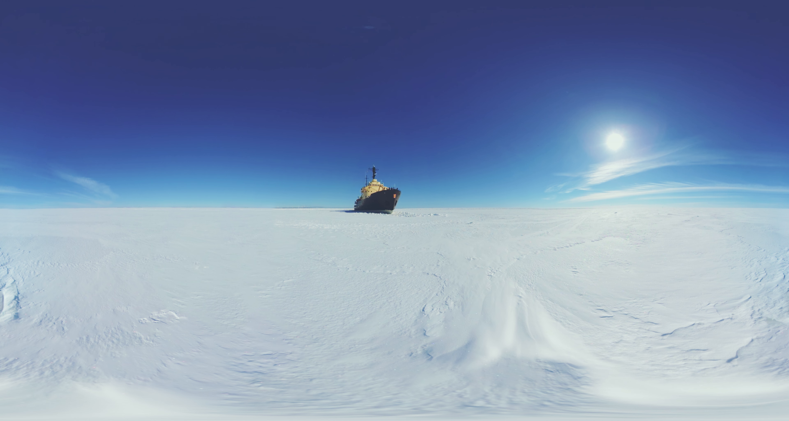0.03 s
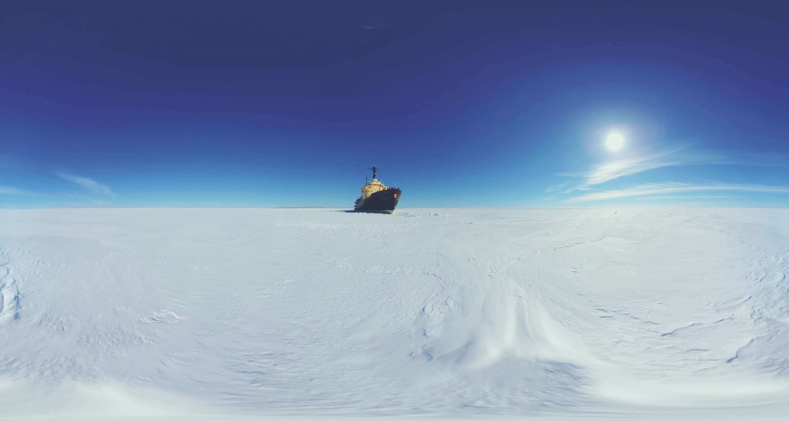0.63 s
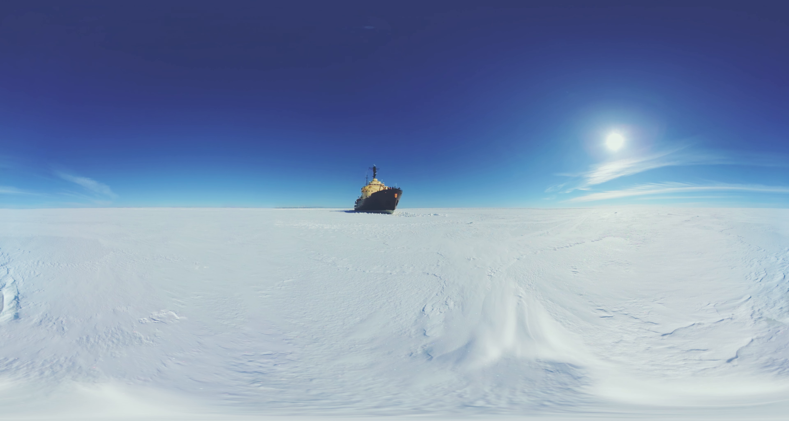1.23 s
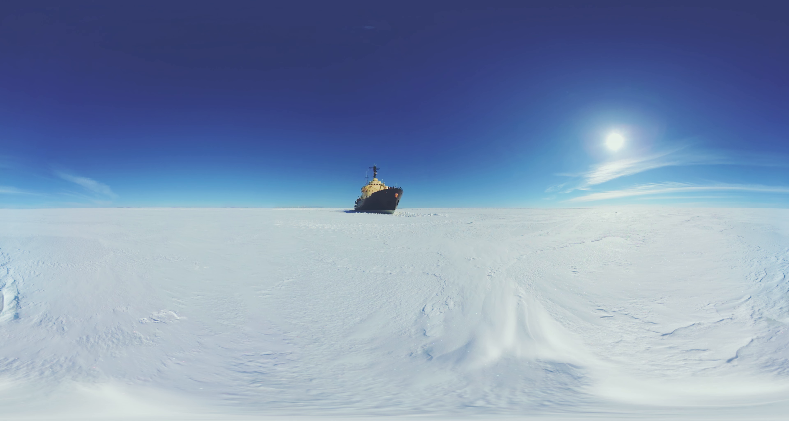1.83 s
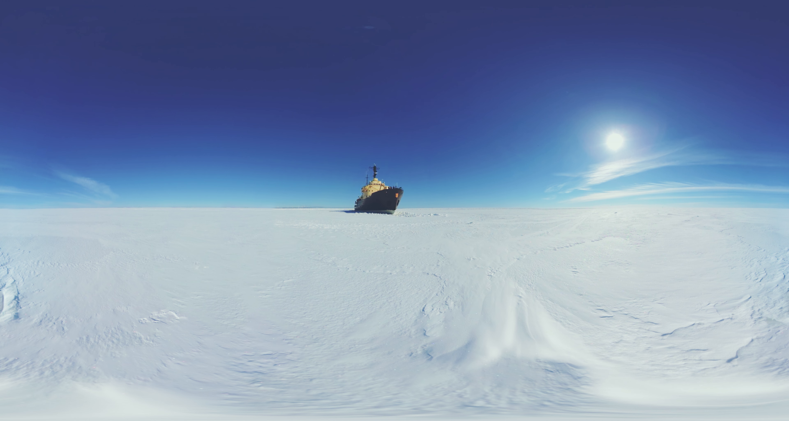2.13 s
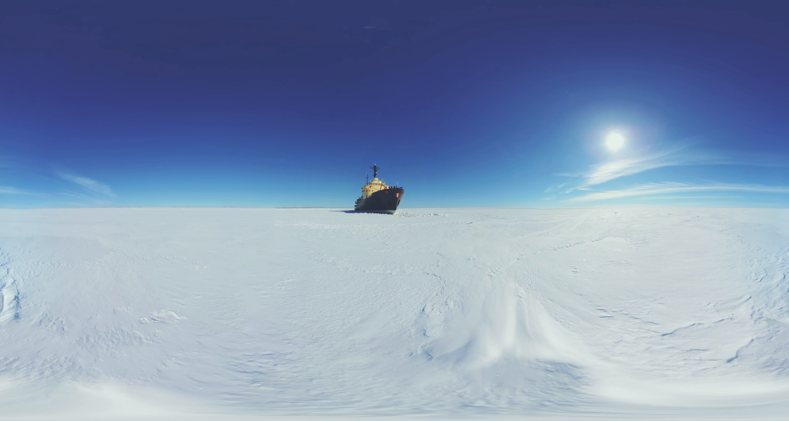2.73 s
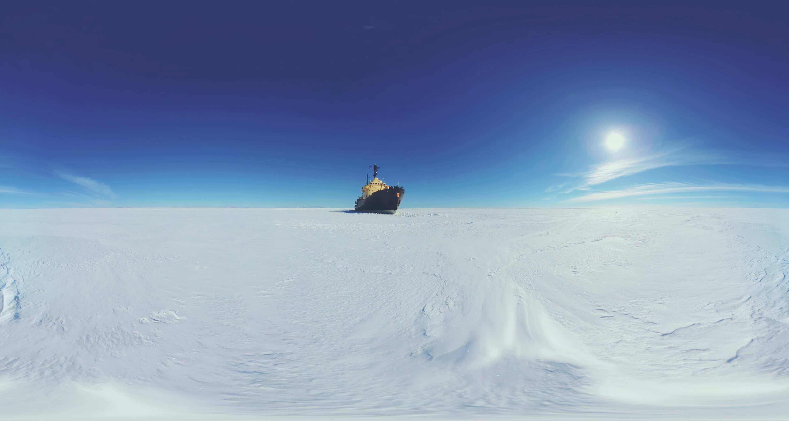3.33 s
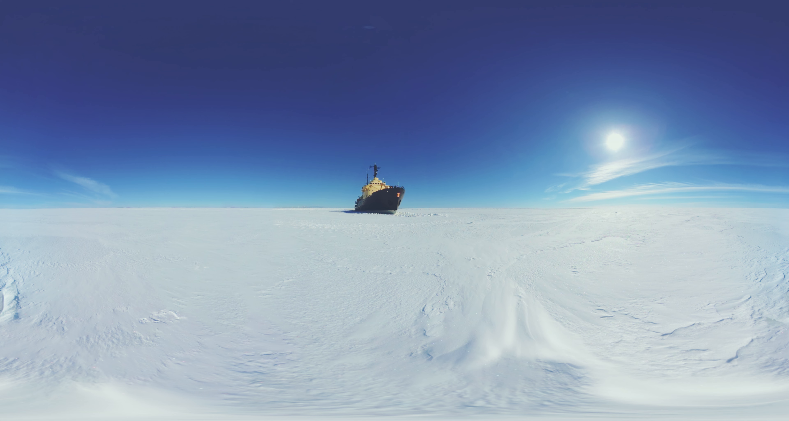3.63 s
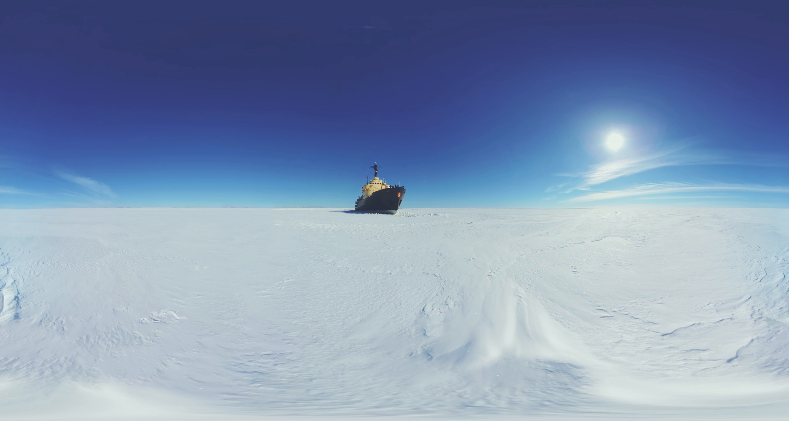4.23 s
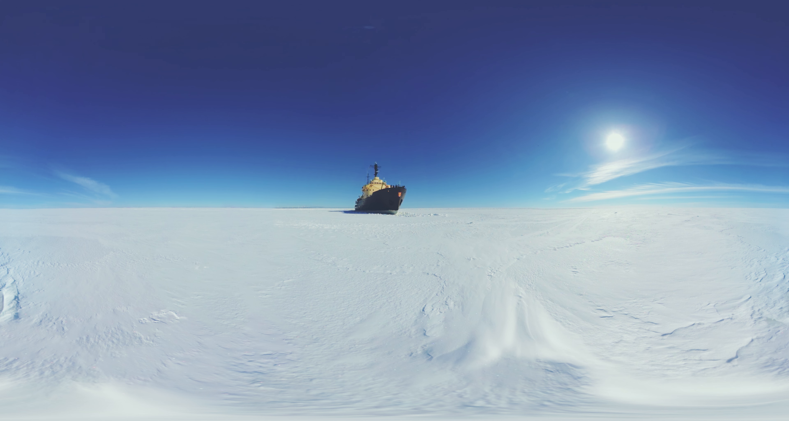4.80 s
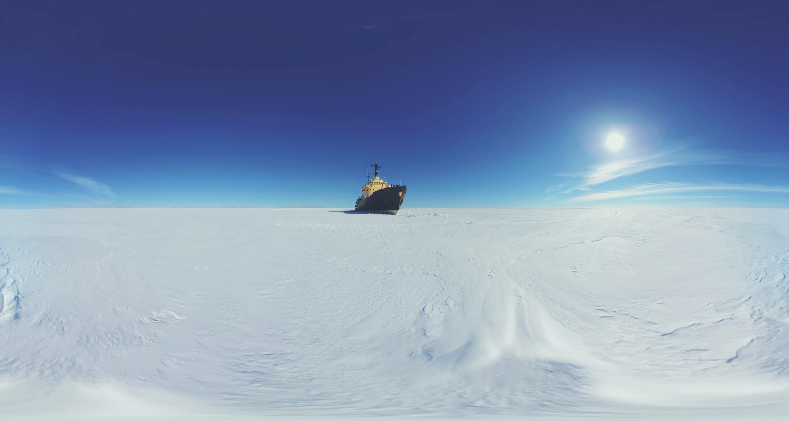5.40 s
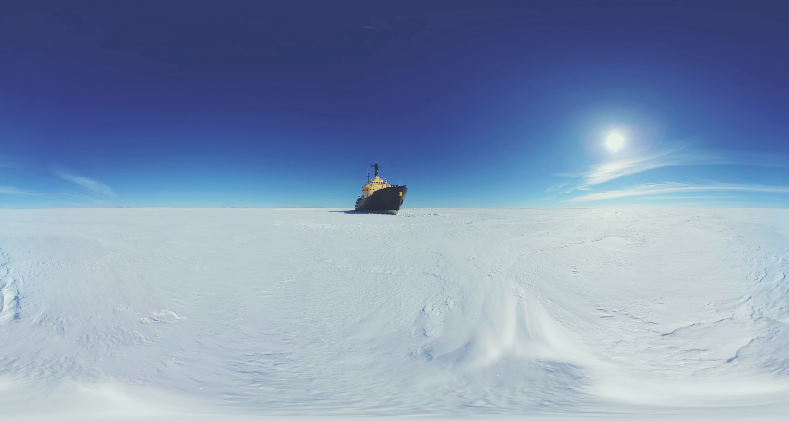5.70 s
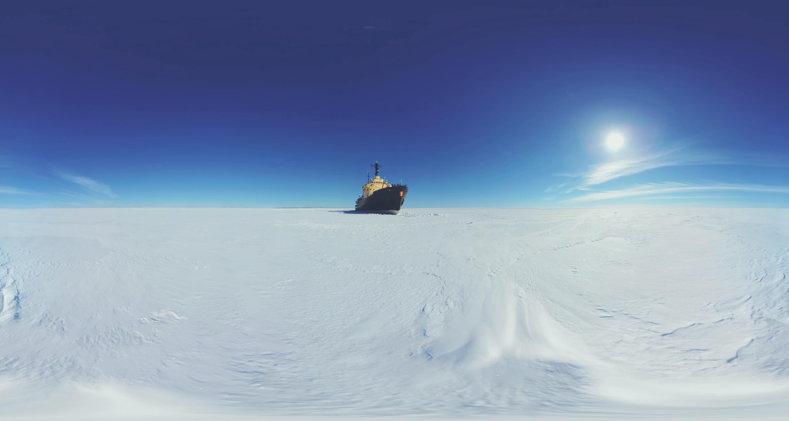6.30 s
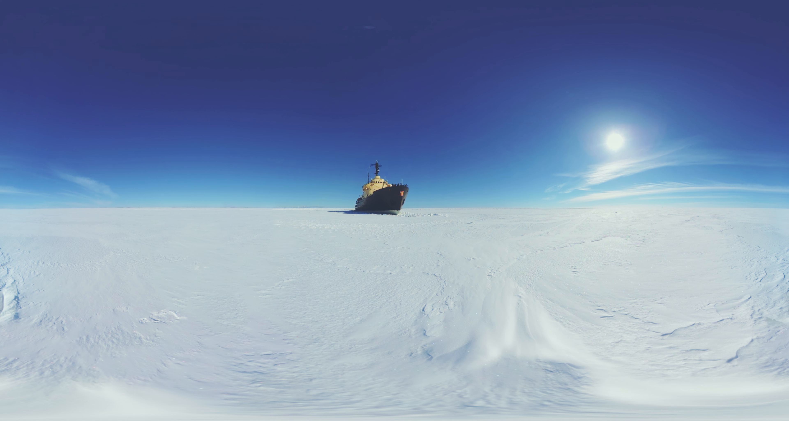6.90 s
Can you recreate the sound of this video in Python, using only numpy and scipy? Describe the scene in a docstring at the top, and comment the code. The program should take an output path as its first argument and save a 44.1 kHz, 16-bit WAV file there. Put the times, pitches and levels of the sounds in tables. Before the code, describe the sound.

Out on an open frozen sea, a light wind makes a low rumble on the microphone while a distant ship's diesel engines hum and slowly pulse. A fan drone from the ship's ducts sits over the engines. Soft rushing air and a barely audible hiss of loose snow continue throughout, with one slight gust early on.

```python
"""An icebreaker's diesel engines throb far off in flat sea ice. They run at slightly different speeds,
so their exhaust tones drift in and out of step and beat. The ship's ventilation drones above them as
fan air rings its ducts. A light wind rumbles at the microphone, drives a faint hiss of loose snow
along the surface and rushes over the ice, with one gentle gust."""
import sys
import numpy as np
from scipy import signal
from scipy.fft import rfft, irfft, next_fast_len
from scipy.io import wavfile

SR = 44100
rng = np.random.default_rng(int(sys.argv[2]) if len(sys.argv) > 2 else 0)


def dump(signal):
    """Clip the signal to [-1, 1] and save it as 16-bit WAV at the path in sys.argv[1]."""
    limited = np.clip(np.atleast_2d(signal).T, -1, 1)
    pcm = np.round(limited * 32767).astype(np.int16)
    wavfile.write(sys.argv[1], SR, pcm)


N = 306495


def from_db(db):
    """Turn decibels into a gain, the number to multiply a sound by."""
    return 10 ** (np.asarray(db) / 20)


def rms_one(x):
    """Scale a signal so that its average strength (rms) is 1."""
    return x / np.sqrt(np.mean(x ** 2) + 1e-30)


def gain_curve(rows):
    """Join (time_s, level_db) points into a gain for every sample."""
    time_s, level_db = np.transpose(rows)
    return from_db(np.interp(np.arange(N) / SR, time_s, level_db))


def drift(rate_hz):
    """A smooth random wander of typical size 1 that changes about rate_hz times a second."""
    step, warm_up = 100, 2000   # one point every 100 samples; skip the points where the filter settles
    memory = np.exp(-2 * np.pi * rate_hz * step / SR)
    jitter = rng.standard_normal(N // step + warm_up + 2)
    slow = signal.lfilter([1], [1, -2 * memory, memory ** 2], jitter)[warm_up:]
    return np.interp(np.arange(N) / step, np.arange(len(slow)), rms_one(slow))


def colour(x, spectrum):
    """Filter a sound by a (pitch_hz, gain_db) curve; beyond its ends the sound dies away steeply."""
    pitch_hz, gain_db = np.transpose(spectrum)
    size = next_fast_len(N)
    bins_hz = np.maximum(np.fft.rfftfreq(size, 1 / SR), 1)
    edge_fade = np.minimum(1, np.minimum(bins_hz / pitch_hz[0], pitch_hz[-1] / bins_hz)) ** 5
    gain = from_db(np.interp(np.log(bins_hz), np.log(pitch_hz), gain_db))
    return irfft(rfft(x, size) * edge_fade * gain, size)[:N]


def noise(spectrum):
    """The noise of swirling air, shaped by a (pitch_hz, level_db_per_hz) curve."""
    return colour(rng.standard_normal(N) * np.sqrt(SR / 2), spectrum)


def diesel(cycle_hz, exhaust, disorder, speed_wander, fading_db, phase_wander, roughness):
    """Uneven cylinders make tones at multiples of the cycle rate; partly in step, they throb."""
    speed_hz = cycle_hz * (1 + speed_wander * drift(0.49))   # the speed control never quite settles
    cycles = rng.random() + np.cumsum(speed_hz) / SR
    tones = np.zeros(N)
    for multiple, level_db in exhaust:
        phase = 2 * np.pi * (multiple * cycles + disorder * rng.random())
        phase += phase_wander * drift(1.5)   # moving air shifts and fades each tone
        tones += from_db(level_db + fading_db * drift(1.2)) * np.sqrt(2) * np.sin(phase)
    return tones * (1 + roughness * drift(20))   # no two firings are equally strong


def engines(lead_hz=5.222, twin_hz=5.165, generator_hz=5.383):
    """Three four-stroke diesels beat together: a lead engine, its slower twin and a deep generator."""
    # exhaust tones of the two main engines, before each one's own gain: cycle_multiple, level_db
    main_exhaust = [(5, -51.4), (7, -53.8), (8, -50.0), (10, -55.0), (11, -63.1), (12, -58.3), (13, -61.5),
                    (18, -61.2), (19, -63.5), (20, -53.3), (21, -52.8), (22, -54.9), (23, -56.1), (25, -67),
                    (30, -53.2), (31, -61.3), (32, -53.7), (33, -56.7), (34, -57.1), (35, -63.5),
                    (36, -65.1), (37, -67.0), (46, -77), (47, -76), (48, -72), (49, -75)]
    # exhaust tones of the generator: cycle_multiple, level_db
    generator_exhaust = [(5, -49.1), (8, -52.2), (10, -50.2)]
    lead = diesel(lead_hz, main_exhaust,
                  disorder=.8, speed_wander=.0015, fading_db=1.6, phase_wander=.3, roughness=.13)
    twin = diesel(twin_hz, main_exhaust,
                  disorder=.9, speed_wander=.0025, fading_db=2.0, phase_wander=.45, roughness=.2)
    dull_twin = signal.sosfilt(signal.butter(2, 190, fs=SR, output="sos"), twin)
    generator = diesel(generator_hz, generator_exhaust,
                       disorder=1, speed_wander=.002, fading_db=2.0, phase_wander=.35, roughness=.15)
    return from_db(-0.5) * lead + from_db(-6.5) * dull_twin + swell() * generator


def swell(crest_s=.72, period_s=1.123, depth_db=1.0, start_db=0.12, fall_db_per_s=0.16):
    """Gain of the generator and the rumble: they swell about once a second and slowly grow quieter."""
    t = np.arange(N) / SR
    wave = np.cos(2 * np.pi * (t - crest_s) / period_s)
    return from_db(start_db - fall_db_per_s * t + depth_db * wave)


def ventilation(fading_db=0.46, start_db=-0.93, rise_db_per_s=0.16):
    """Swirling fan air rings the ducts; each note swells and fades on its way over the ice."""
    # notes at which the ducts and their casing ring: pitch_hz, width_hz, level_db
    ducts = [(349.2, 13, -74.5), (422, 16, -75), (475, 29.6, -67.5), (519.3, 13, -73.5), (551.2, 22, -70),
             (695, 41, -76.5), (745.4, 46, -67.5), (792.7, 22, -71.5), (1190, 58, -83.5), (1319, 40, -84.5),
             (1678, 79, -91)]
    drone = np.zeros(N)
    for pitch_hz, width_hz, level_db in ducts:
        edges_hz = [pitch_hz - width_hz / 2, pitch_hz + width_hz / 2]
        duct = signal.butter(2, edges_hz, "band", fs=SR, output="sos")
        gain = from_db(level_db + fading_db * drift(1.1))
        drone += gain * rms_one(signal.sosfilt(duct, rng.standard_normal(N)))
    # the air carries the drone better and better
    return from_db(start_db + rise_db_per_s * np.arange(N) / SR) * drone


def rumble():
    """Slow swirls of wind press on the microphone."""
    # low rumble of wind and ship: pitch_hz, level_db_per_hz
    rumble_spectrum = [(10, -60), (20, -66), (38, -62), (58, -63), (80, -66), (112, -68), (140, -76),
                       (180, -72.5), (205, -83), (240, -90)]
    return swell() * noise(rumble_spectrum)


def snow(grains_per_s=15000, reference_db=-87):
    """Countless tiny snow grains tick on the crust and merge into a hiss."""
    # hiss of sliding grains when its level is reference_db: pitch_hz, level_db_per_hz
    hiss_spectrum = [(4000, -136), (6000, -129), (8000, -126), (10000, -124), (11300, -125.5),
                     (13000, -131.5), (16000, -133.5)]
    # strength of the blowing snow: time_s, level_db
    hiss_levels = [(0.1, -89.5), (0.55, -90), (0.66, -88), (0.96, -90.5), (3.78, -85), (4.87, -87),
                   (6.79, -85), (6.85, -84.5)]
    ticks = rms_one(rng.standard_normal(N) * (rng.random(N) < grains_per_s / SR))
    hiss = colour(ticks * np.sqrt(SR / 2), hiss_spectrum)
    return gain_curve(hiss_levels) / from_db(reference_db) * hiss


def rushing_air(flutter_db=0.75, split_hz=800):
    """Air rushes over the ice: a steady, wide low wash, with a brighter part that follows the wind."""
    # air rushing over the ice: pitch_hz, level_db_per_hz
    air_spectrum = [(180, -89), (280, -86), (400, -90), (630, -90.5), (900, -92.5), (1100, -97),
                    (1450, -102.5), (1750, -103.5), (2100, -107.5), (3000, -111.5), (4200, -119.5),
                    (6000, -127), (10000, -138)]
    # stereo width of the air, as the side signal's level against the middle: pitch_hz, gain_db
    stereo_width = [(100, -37), (170, -18.5), (250, -13), (420, -9.5), (650, -17), (1000, -22),
                    (1500, -26.5), (2200, -59)]
    air = noise(air_spectrum)
    low = signal.sosfiltfilt(signal.butter(2, split_hz, fs=SR, output="sos"), air)
    wind_gain = gust() * from_db(flutter_db * drift(6.7))
    middle = low + wind_gain * (air - low)
    side = colour(noise(air_spectrum), stereo_width)
    return middle + side * np.array([[1], [-1]])   # add on the left, subtract on the right


def gust(start_s=1.28, lull_s=0.3, rise_s=0.61, hold_s=1.3, settle_s=.3):
    """Gain of the breeze: it drops, picks up in one gust, holds, then settles."""
    times_s = start_s - lull_s + np.cumsum([0, lull_s, rise_s, hold_s, settle_s])
    levels_db = [-2.6, -4, .4, 0.1, -0.64]   # calm, lull, top of the gust, end of the hold, breeze
    return gain_curve(list(zip(times_s, levels_db)))


def scene():
    """Ship, rumble and snow sit in the middle; only the rushing air spreads left and right."""
    return engines() + ventilation() + rumble() + snow() + rushing_air()


def record(dry, cutoff_hz=15700):
    """Cut away the highest treble steeply."""
    return signal.sosfilt(signal.ellip(10, .1, 80, cutoff_hz, fs=SR, output="sos"), dry)


dry = scene()
out = record(dry)
dump(out)
```